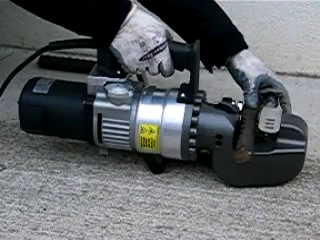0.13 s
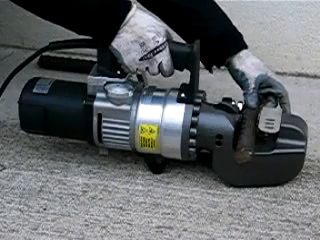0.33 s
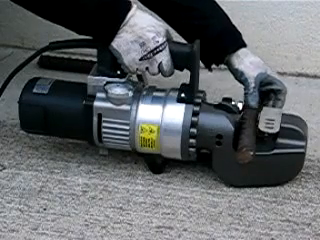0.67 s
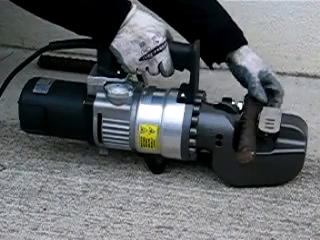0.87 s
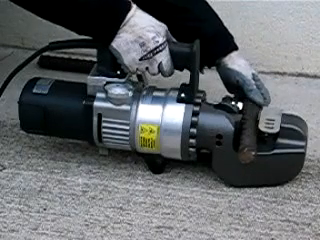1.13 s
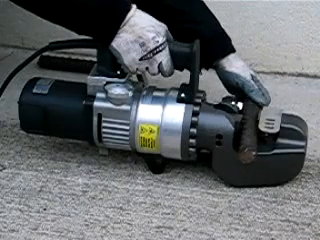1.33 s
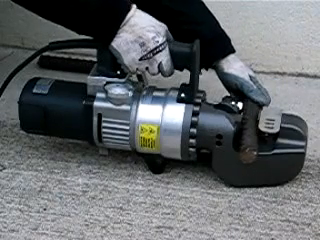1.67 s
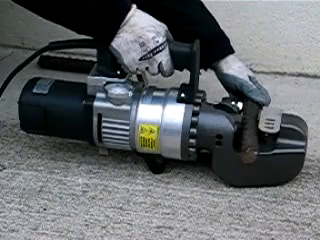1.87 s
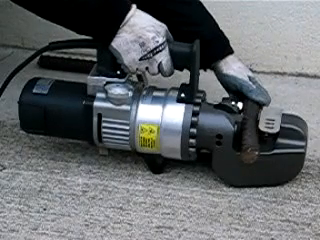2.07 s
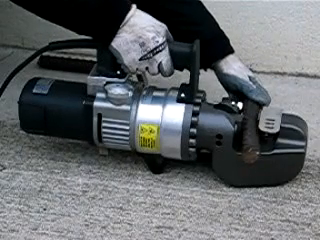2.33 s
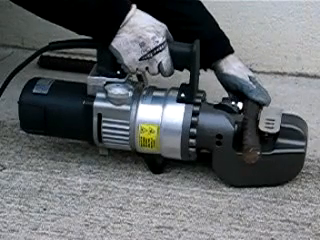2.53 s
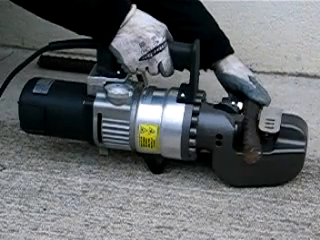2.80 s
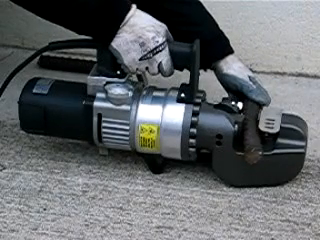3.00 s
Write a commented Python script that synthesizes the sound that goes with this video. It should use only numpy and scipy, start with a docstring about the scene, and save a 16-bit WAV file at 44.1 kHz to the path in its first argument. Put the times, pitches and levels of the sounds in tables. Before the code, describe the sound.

A portable electric hydraulic shear whines close by, already running at a high pitch. From about 0.3 seconds the whine slides downward as the blade presses into a steel bar, turning rougher around 1.2 seconds. By 2 seconds it is nearly an octave lower and sags only slightly more, still running just past 3 seconds. Pump rasp, hiss and a faint low hum lie underneath throughout.

```python
"""A high motor whine sounds close by, then sinks an octave as a portable electric hydraulic shear
presses its blade into a steel bar. The growing load halves the shaft speed, so the harmonics of
the rotation (shaft orders) from gears and pump sweep down through the fixed resonances of the
housing. Pump rasp, brush hiss, fan air, a faint steady hum and a low rumble lie underneath."""
import sys
import numpy as np
from scipy.fft import rfft, irfft, next_fast_len
from scipy.io import wavfile
from scipy.ndimage import map_coordinates

SR = 44100
rng = np.random.default_rng(int(sys.argv[2]) if len(sys.argv) > 2 else 0)


def materialize(psi):
    """Save the field psi as 16-bit PCM at rate SR to the path in sys.argv[1].

    A 1-D psi becomes a single channel; in a 2-D psi each row is a channel.
    """
    bounded = np.clip(np.atleast_2d(psi).T, -1, 1)
    quanta = np.round(bounded * 32767).astype(np.int16)
    wavfile.write(sys.argv[1], SR, quanta)


N = 140238

# The four leading whines. Each entry: a shaft order, in cycles per turn.
WHINE_ORDERS = (2, 5, 8, 13)


def shaft(jitter_turns=0.00088, jitter_hz=70):
    """Load slows the motor, and a slight shudder phase-modulates its rotation. Gives speed and angle."""
    # Each row: time in seconds, speed in turns per second.
    slowdown = [(0.0, 221.47), (0.17, 223.81), (0.3, 221.49), (0.42, 214.48), (0.6, 199.96), (0.8, 183.74),
                (1.0, 167.37), (1.2, 152.98), (1.38, 142.95), (1.6, 134.39), (1.8, 128.83), (2.0, 125.06),
                (2.2, 123.1), (2.4, 119.38), (2.6, 116.13), (2.8, 114.44), (3.0, 112.45), (3.18, 110.94)]
    speed, = curves(slowdown)
    turns = np.cumsum(speed) / SR + jitter_turns * wobble(jitter_hz)
    return speed, 2 * np.pi * turns


def whines(angle):
    """Harmonics locked to the rotation fall in pitch with the shaft; the lowest throbs fast and unevenly."""
    # Each row: time in seconds, then the level in dB of each of the four whines.
    levels = [(0.0, -51, -50.5, -40.5, -34), (0.402, -51, -52, -47.5, -35.5),
              (0.45, -56, -60.5, -34.5, -44.5), (0.78, -58, -33.5, -46.5, -38), (1.0, -56, -41, -44, -41.5),
              (1.198, -80, -41, -46.5, -31.5), (1.5, -61, -38.5, -53.5, -40), (1.9, -67, -36.5, -45.5, -35),
              (2.251, -98, -35, -37.5, -32), (2.519, -76, -37.0, -27.5, -38), (2.7, -43, -34, -30.5, -39),
              (3.18, -38.5, -38.5, -30.5, -42)]
    lowest, *upper = [amp(db) * tone(order * angle, wander_db=1.06, flutter=0.13, phase_spread=1.6)
                      for order, db in zip(WHINE_ORDERS, curves(levels))]
    return lowest * chatter(0.6) + sum(upper)


def gears(speed, angle, drift_db=4, chatter_order=26.3):
    """Source and filter: housing resonances shape a bed of gear harmonics; single tones swell above it."""
    # Spectrum of the bed. Each row: shaft order, level in dB.
    bed_levels = [(33, -46.5), (50, -56)]
    # Orders below 10 fill in as the blade bites. Each row: time in seconds, gain in dB.
    bite = [(1.05, -5.5), (1.25, 6.5), (1.9, 0)]
    # Response of the housing. Each row: frequency in Hz, gain in dB.
    housing = [(350,-22.5),(480,1),(750,-7.5),(1100,-9.5),(1400,-0.5),(2000,0.5),(2300,-6.5),(2900,4),(4200,1.5),(4530,0.5),(4800,-1.5),(5500,-4.5),(6000,-10),(6600,-31.5)]
    # Tones that sing out in turn; the one between whole orders beats with its neighbour.
    # Each row: shaft order, middle in seconds, half-amplitude length in seconds, peak level in dB.
    swells = [(11, 0.04, 0.3, -35.0), (16, 0.06, 0.2, -35.5), (18, 0.1, 0.24, -36.5),
              (15, 0.18, 0.07, -36.0), (19, 0.22, 0.12, -34.0), (21, 0.31, 0.17, -36.5),
              (25, 0.31, 0.1, -40), (12, 0.35, 0.16, -36.0), (16, 0.39, 0.2, -36.5), (14, 0.5, 0.34, -38.5),
              (10, 0.54, 0.34, -38.5), (17, 0.55, 0.38, -32.5), (23, 0.56, 0.23, -37.5),
              (19, 0.62, 0.27, -33.0), (16, 0.7, 0.17, -33.0), (21, 0.85, 0.11, -33.5),
              (18, 0.93, 0.22, -32.0), (22, 0.95, 0.14, -37.0), (17, 0.98, 0.19, -33.0),
              (19, 1.07, 0.23, -30.5), (10, 1.12, 0.21, -36.0), (11, 1.29, 0.26, -37.5),
              (21, 1.29, 0.23, -31.0), (20, 1.33, 0.32, -38.0), (22, 1.47, 0.27, -33.5),
              (10, 1.55, 0.64, -37.5), (15, 1.56, 0.22, -35.5), (12.75, 1.65, 0.28, -43.0),
              (24, 1.71, 0.3, -34.0), (7, 1.78, 0.61, -35.5), (25, 1.88, 0.33, -39.5),
              (17, 1.96, 0.29, -39.0), (30, 2.0, 0.52, -33.5), (29, 2.12, 0.77, -38.5),
              (38, 2.45, 0.09, -39.0), (7, 2.53, 1.03, -40.5), (14, 2.68, 1.01, -42.0),
              (39, 2.68, 0.16, -40), (27, 2.69, 0.68, -33.0), (33, 2.81, 0.64, -36.0),
              (28, 2.9, 0.59, -34.0), (34, 2.98, 0.63, -39.5), (18, 3.07, 0.65, -35.0),
              (16, 3.08, 0.22, -37.5)]
    # Pump chatter. Each row: time in seconds, modulation depth (0 to 1) of the highest orders.
    chatter_depths = [(2.1, 0.2), (2.6, 0), (3.18, 0.1)]
    bite_db, = curves(bite)
    power = {}
    for order in range(3, 54):
        if order not in WHINE_ORDERS:
            source_db = along(bed_levels, order) + bite_db * (order < 10) + drift_db * wobble(5.91)
            power[order] = amp(source_db + along(housing, order * speed)) ** 2
    for order, middle, length, db in swells:
        envelope = 2 ** -np.abs(2 * (np.arange(N) / SR - middle) / length) ** 3
        power[order] = power.get(order, 0) + (amp(db) * envelope) ** 2
    depth, = curves(chatter_depths)
    sound = 0
    for order in power:
        throb = chatter(depth / (1 + (chatter_order / order) ** 10))  # upper orders shake most
        partial = tone(order * angle, wander_db=0.98, flutter=0.14, phase_spread=1.74)
        sound += np.sqrt(power[order]) * throb * partial
    return sound


def chatter(depth, rate_hz=21):
    """Amplitude modulation by the pump: a gain that throbs fast and unevenly."""
    return 1 + depth * np.sin(2 * np.pi * rate_hz * np.arange(N) / SR + 2 * wobble(7))


def pump(angle, sharpness=1.0):
    """Pressure pulsation: the pump rasps in two bursts of noise a turn."""
    # Each row: time in seconds, level in dB.
    levels = [(.14, -47.5), (.18, -35), (.24, -43), (.95, -42), (1.25, -34), (1.5, -40), (2.2, -41.5),
              (3.18, -33)]
    # Each row: frequency in Hz, relative spectral density in dB.
    spectrum = [(400, -13), (1200, -8.5), (1750, -3), (2300, -11.5), (3150, 0.5), (3700, 0.5), (6000, -50)]
    rasp_db, = curves(levels)
    bursts = np.exp(sharpness * np.cos(2 * angle))
    return amp(rasp_db) * noise(spectrum, bursts)


def hiss_and_fan(angle, pulse_depth=0.27):
    """Friction at brushes and bearings hisses, pulsing once a turn; fan turbulence fades as it slows."""
    # Each row: time in seconds, hiss level in dB, fan level in dB.
    levels = [(0, -32, -37), (.35, -36, -42), (.75, -36.5, -44.5), (1.25, -36.5, -53), (2.2, -35.5, -55.5),
              (3.18, -37, -49.5)]
    # Each row of both spectra: frequency in Hz, relative spectral density in dB.
    hiss_spectrum = [(700, -5.5), (1150, -10.5), (2000, 0.5), (2400, -2), (3200, -3), (3700, 1), (4900, -1),
                     (5450, 2), (6000, -8.5), (6700, -27)]
    fan_spectrum = [(100, -13.5), (400, -2.5), (530, 5), (700, -5), (1500, -42.5)]
    hiss_db, fan_db = curves(levels)
    hiss = amp(hiss_db) * noise(hiss_spectrum, 1 + pulse_depth * np.cos(angle))
    return hiss + amp(fan_db) * noise(fan_spectrum)


def background(rumble_db=-47.5):
    """Superposition of two faint tones of steady pitch and an even, low rumble of noise."""
    # Each row: frequency in Hz, level in dB.
    hum_tones = [(100, -63), (209, -53)]
    # Each row: frequency in Hz, relative spectral density in dB.
    rumble_spectrum = [(42, 3), (70, -12.5), (130, -1), (200, -9), (650, -40.5)]
    t = np.arange(N) / SR
    hum = sum(amp(db) * tone(2 * np.pi * hz * t, wander_db=-3.0, flutter=0.095, phase_spread=1.2)
              for hz, db in hum_tones)
    return hum + amp(rumble_db) * noise(rumble_spectrum)


def tone(angle, wander_db, flutter, phase_spread):
    """Random modulation: a sinusoid of rms near 1 wanders in level and flutters in level and phase."""
    envelope = amp(wander_db * wobble(6.11)) * (1 + flutter * wobble(90))
    phase = angle + phase_spread * rng.standard_normal() + flutter * wobble(90)
    return np.sqrt(2) * envelope * np.cos(phase)


def noise(spectrum, gate=1):
    """Spectral shaping: white noise is gated, filtered and scaled to rms 1."""
    shaped = filtered(gate * rng.standard_normal(N), lambda hz: amp(along(spectrum, hz)))
    return shaped / np.sqrt(np.mean(shaped ** 2) + 1e-20)


def filtered(x, response):
    """Linear filtering: the spectrum of x is multiplied by a frequency response."""
    size = next_fast_len(N + SR // 2)
    return irfft(rfft(x, size) * response(np.fft.rfftfreq(size, 1 / SR)), size)[:N]


def wobble(rate):
    """Smooth random motion: a spline through `rate` random knots a second."""
    coarse = np.linspace(0, N, num=4096)
    knots = rng.standard_normal(2048)
    spline = map_coordinates(knots, [coarse * rate / SR], mode="wrap")
    return np.interp(np.arange(N), coarse, spline)


def curves(rows):
    """Linear interpolation in time: one value per sample for each column after the first."""
    seconds, *columns = np.transpose(rows)
    return [np.interp(np.arange(N) / SR, seconds, column) for column in columns]


def along(points, frequency):
    """Interpolation on a logarithmic axis of frequency or shaft order."""
    axis, values = np.transpose(points)
    return np.interp(np.log(frequency + 1), np.log(axis + 1), values)


def amp(db):
    """Decibels to amplitude ratio."""
    return 10 ** (np.asarray(db) / 20)


def scene():
    """Superposition: one shaft drives every part of the tool, and their sounds add to the background."""
    speed, angle = shaft()
    shear = gears(speed, angle) + whines(angle) + hiss_and_fan(angle) + pump(angle)
    return (shear + background())[None]


def record(dry, cutoff_hz=7050):
    """Band limiting: an ideal low-pass filter removes the top treble."""
    return filtered(dry[0], lambda hz: hz < cutoff_hz)[None]


dry = scene()
out = record(dry)
materialize(out)
```